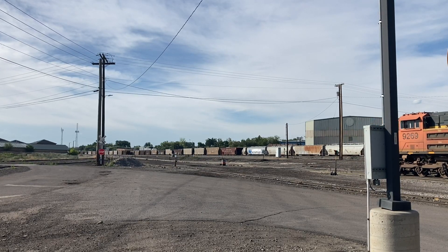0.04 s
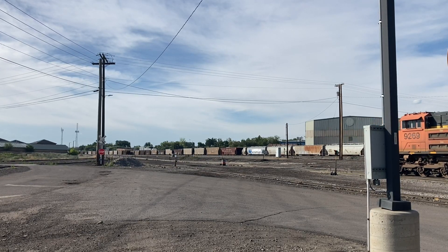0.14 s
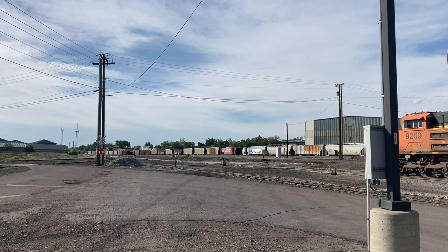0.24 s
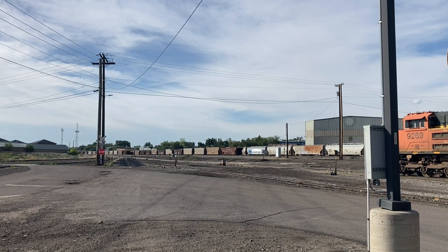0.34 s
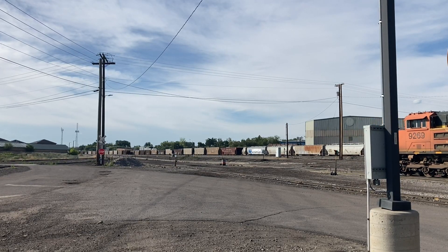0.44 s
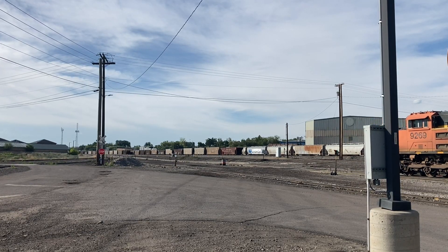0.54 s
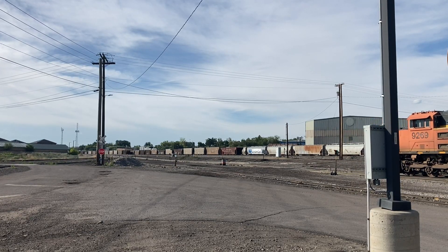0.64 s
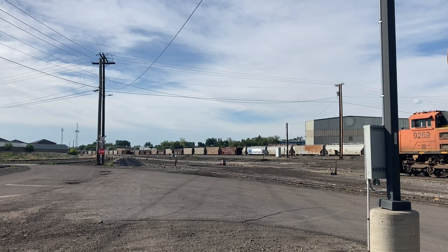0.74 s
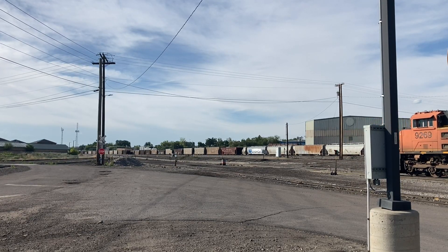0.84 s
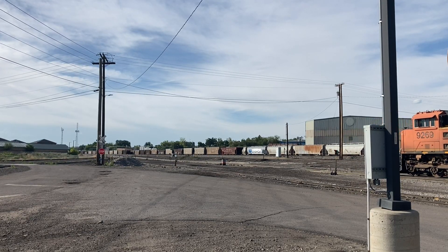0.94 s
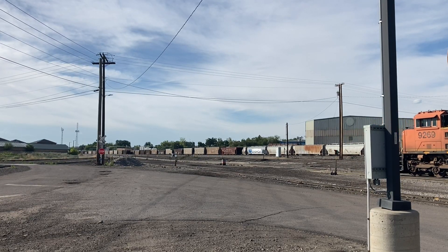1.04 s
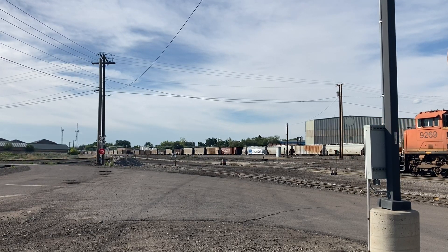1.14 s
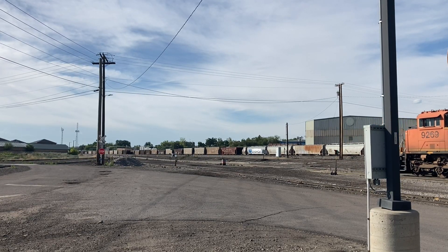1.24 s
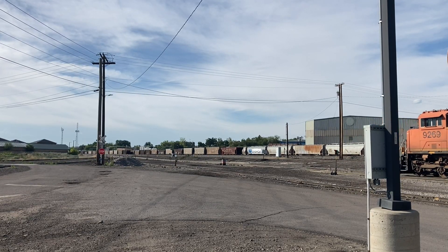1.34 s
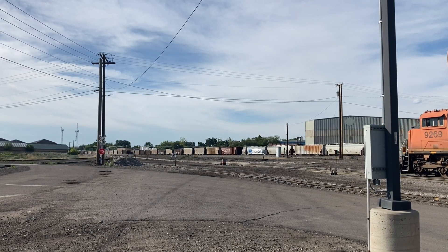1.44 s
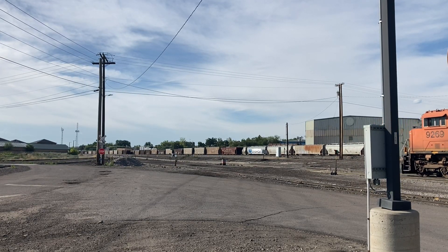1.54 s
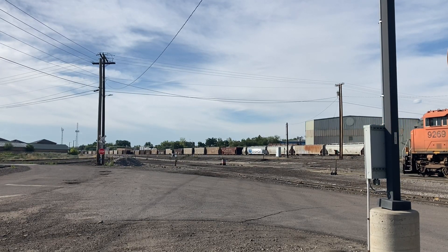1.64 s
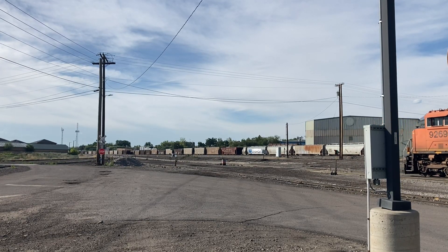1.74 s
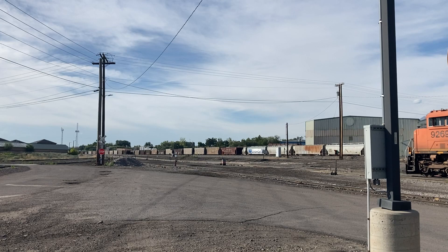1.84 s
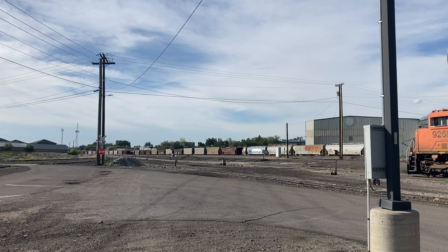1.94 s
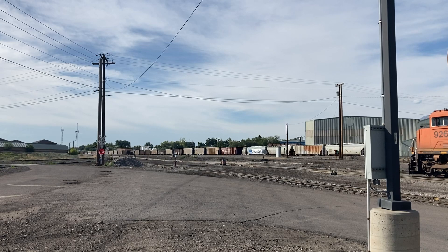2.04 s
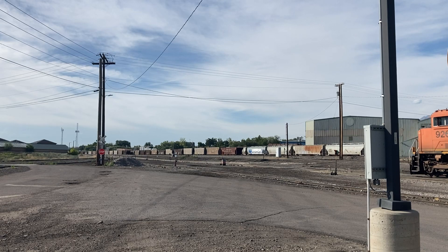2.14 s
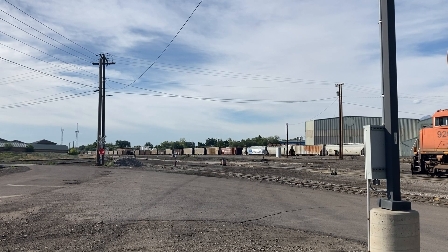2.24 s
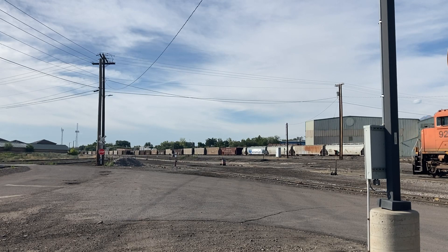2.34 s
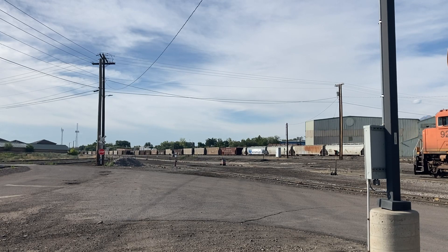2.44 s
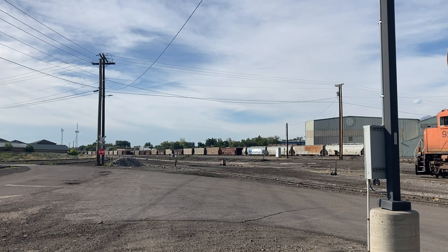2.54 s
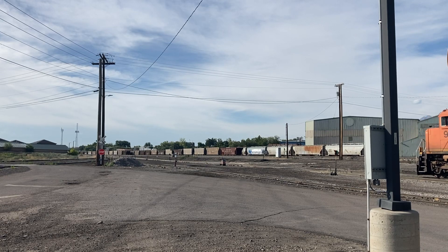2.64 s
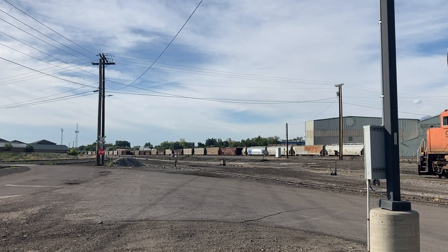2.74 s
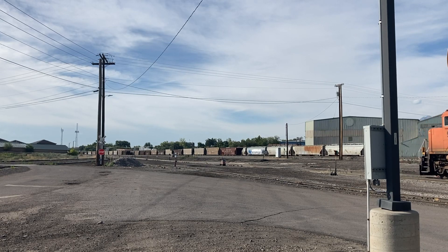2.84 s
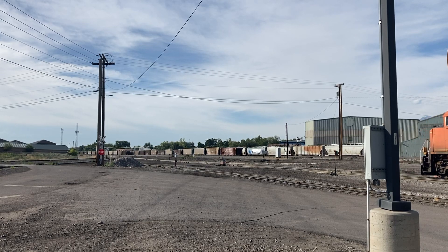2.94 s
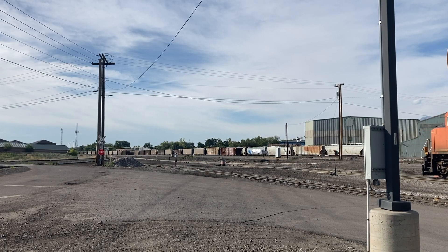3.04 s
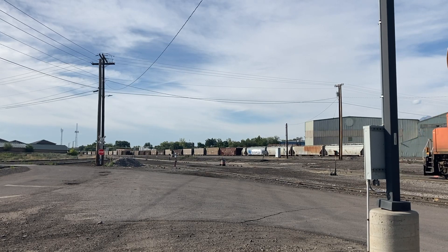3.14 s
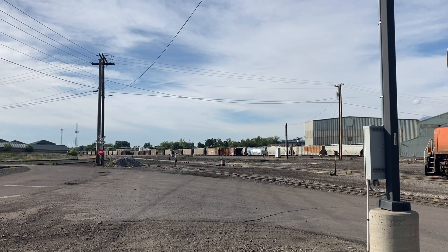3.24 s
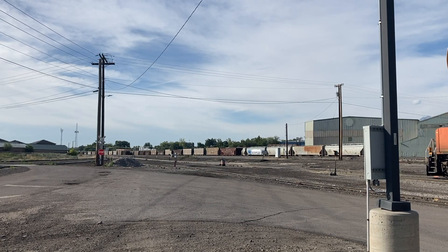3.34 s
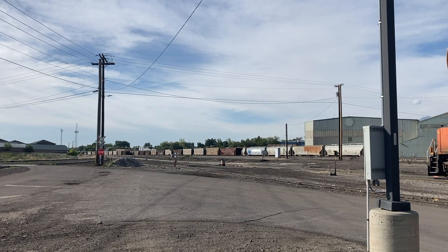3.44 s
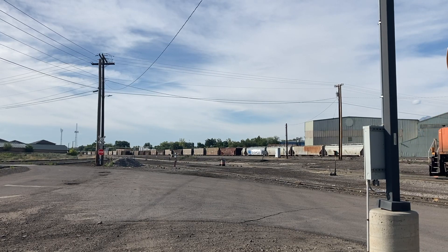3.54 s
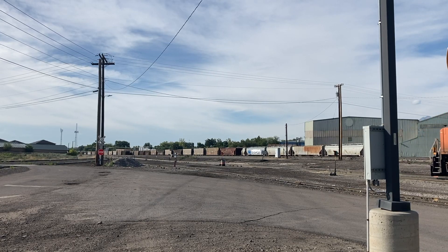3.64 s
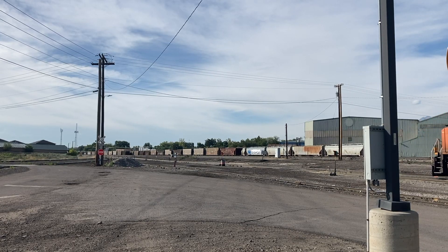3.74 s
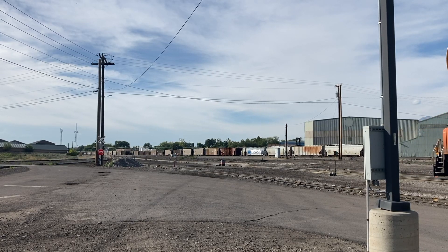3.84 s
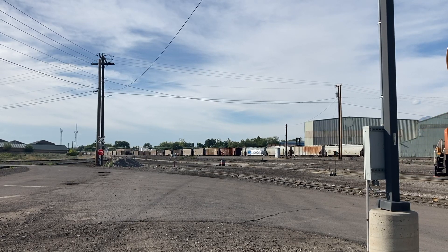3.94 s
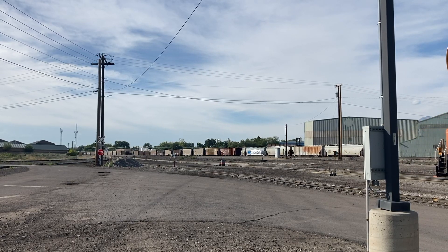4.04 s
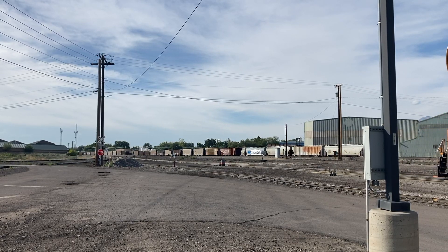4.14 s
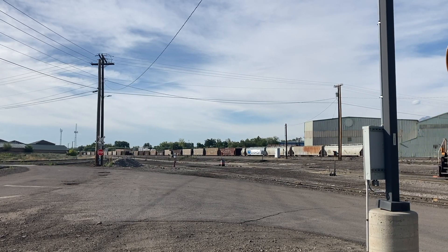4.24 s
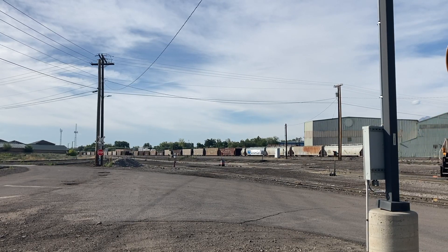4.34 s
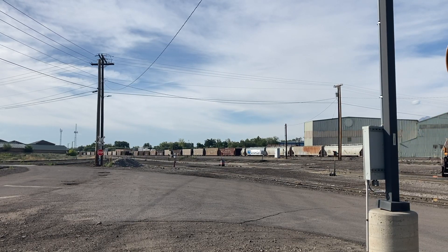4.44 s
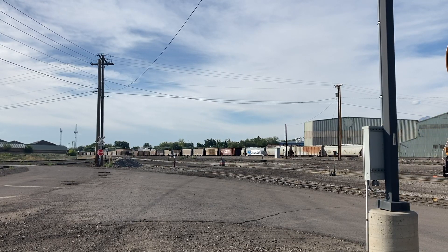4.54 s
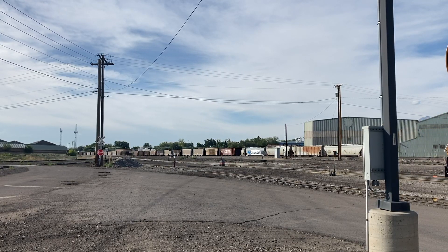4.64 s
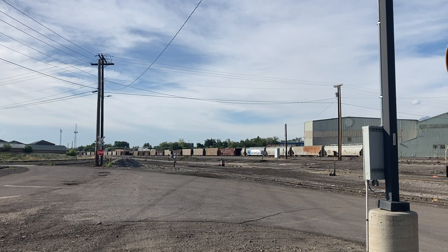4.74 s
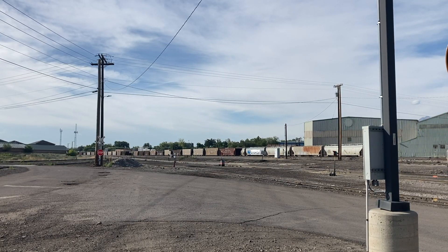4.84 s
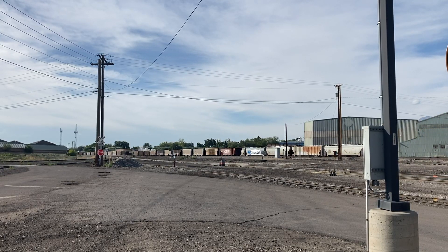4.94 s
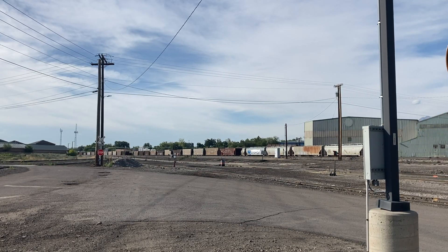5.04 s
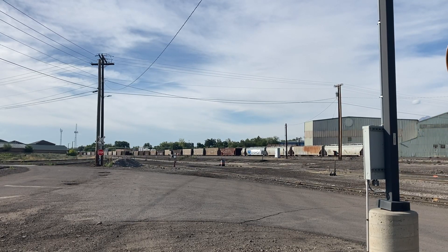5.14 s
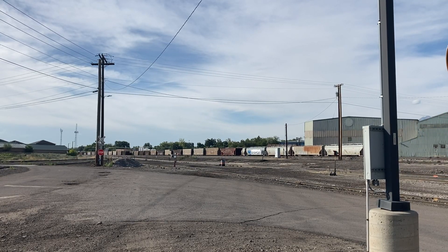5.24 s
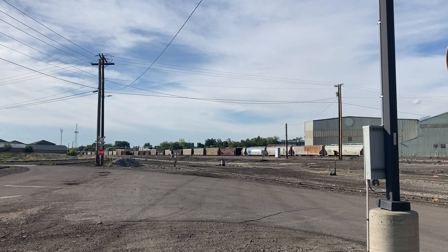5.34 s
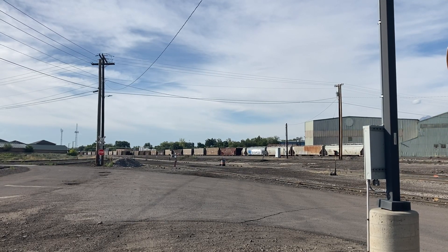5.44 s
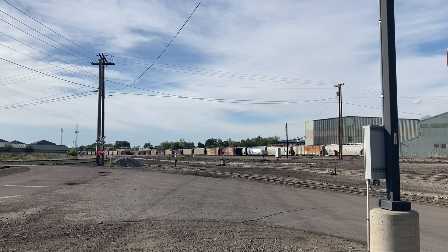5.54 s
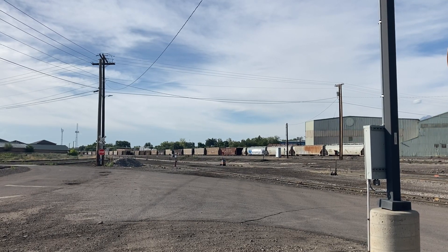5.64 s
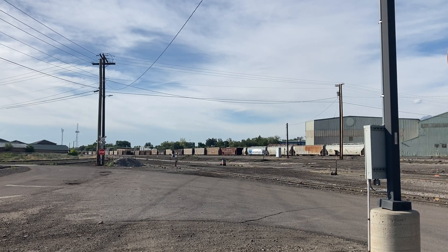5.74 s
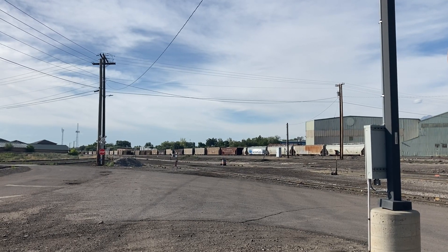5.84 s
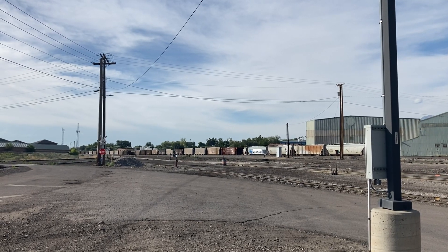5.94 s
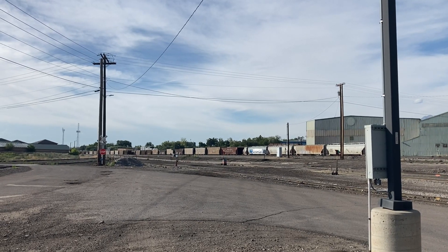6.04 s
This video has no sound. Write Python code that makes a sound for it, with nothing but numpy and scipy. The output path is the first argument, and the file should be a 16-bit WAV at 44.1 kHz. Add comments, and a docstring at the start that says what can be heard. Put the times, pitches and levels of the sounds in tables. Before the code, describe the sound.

A second engine hums behind a loud diesel drone, with cooling air rushing, panels rattling and little air puffs pulsing quickly. The whines rise slightly, then glide downward as the locomotive slows its engine and recedes. Short air spits break through, fast soft thumps stand out, and faint metallic wheel squeaks end it. Heard outdoors from a fixed phone across a yard, with a faint wall echo.

```python
"""A diesel engine's drone leads, with gear and turbocharger whine; it throttles down as the train rolls away.
A compressor thumps and puffs once a turn, a second engine hums behind, wheel flanges squeal near the end.
Shaft-locked sines make the engines, pulses through resonances the thumps, shaped noise the exhaust roar,
cooling air, puffs and rumble, knocked resonators the panel rattle. Two ports on a phone body listen."""
import sys
import numpy as np
from scipy import signal
from scipy.fft import rfft, irfft, next_fast_len
from scipy.io import wavfile
from scipy.ndimage import uniform_filter1d

SR = 44100
rng = np.random.default_rng(int(sys.argv[2]) if len(sys.argv) > 2 else 0)


def wrap_up_sound(samples):
    """Save the sound to the file named by the first command line argument, as 16-bit audio."""
    columns = np.atleast_2d(samples).T
    # keep every value between -1 and 1, then stretch to whole-number steps
    tamed = np.clip(columns, -1, 1)
    steps = np.round(tamed * 32767).astype(np.int16)
    wavfile.write(sys.argv[1], SR, steps)


N = 268569
SIZE = next_fast_len(N)
TIME, FREQ = np.arange(N) / SR, np.fft.rfftfreq(SIZE, 1 / SR)

# First engine: (time [s], four-stroke rate [cycles/s], turbocharger blade tone [Hz])
ENGINE_SPEED = [(0, 6.169, 5595), (.45, 6.174, 5620), (.95, 6.228, 5655), (1.35, 6.25, 5662),
                (1.7, 6.287, 5660), (1.95, 6.27, 5645), (2.27, 6.195, 5570), (2.65, 6.11, 5480),
                (3, 5.95, 5370), (3.4, 5.825, 5215), (3.7, 5.69, 5100), (4.1, 5.487, 4945),
                (4.55, 5.322, 4815), (5.3, 5.165, 4655), (6.09, 5.035, 4560)]
# Firing drone: (multiple of the cycle, relative level [dB])
FIRING_PARTS = [(8, 0), (9, -7), (10, -12)]
# Drone of uneven cylinders: (multiple of the cycle, relative level [dB])
UNEVEN_PARTS = [(9, -8), (10, -8), (11, -6), (12, -3), (13, -6), (14, -12), (15, -5), (16, -6), (17, -10),
                (19, -10)]
# Gear whines: teeth meshing per cycle, in the column order of GEAR_LEVELS
GEAR_TEETH_PER_CYCLE = [221.3, 442.6, 191.7, 110.6, 97.2]
# Gear whines: (time [s], then the level of each whine [dB])
GEAR_LEVELS = [(0, -37, -68, -63, -63, -64), (.4, -38, -65, -62, -60, -62), (.7, -39, -62, -62, -54, -60),
               (.87, -47, -72, -64, -40, -60), (1.05, -38, -54, -62, -44, -60),
               (1.33, -49, -59, -49, -55, -60), (1.45, -41.5, -52.5, -48, -53, -60),
               (2.03, -38, -53.5, -48, -60, -60), (2.13, -46.5, -63, -55, -56, -58),
               (2.6, -42, -55, -60, -52, -54), (2.75, -52, -61, -60, -50, -54),
               (2.9, -44, -63, -64, -43, -53), (3.15, -52, -55, -62, -49, -52),
               (3.45, -50, -67, -68, -44, -54), (3.6, -63, -70, -68, -53, -46.5),
               (4.05, -58, -74, -70, -55, -49.5), (4.3, -48.5, -70, -66, -57, -51.5),
               (5.2, -52.5, -70, -72, -58, -57), (5.5, -55, -69, -69, -57, -50),
               (6.09, -56, -75, -71, -61.5, -51)]
# First turbocharger: (time [s], level [dB])
TURBO_LEVEL = [(0, -58), (.2, -63), (.75, -65), (1, -53), (1.5, -58), (1.7, -66), (1.85, -57), (2.15, -67),
               (2.35, -59), (2.9, -59), (3.4, -57), (3.95, -55), (4.17, -61), (4.4, -56), (4.75, -57),
               (5.1, -61), (5.6, -57.5), (6.09, -55)]
# Second turbocharger: (time [s], blade tone [Hz], level [dB])
FAR_TURBO = [(3.9, 5480, -86), (4.8, 5460, -73), (6.09, 5440, -72)]
# Second engine drone: (multiple of the cycle, relative level [dB])
SECOND_DRONE_PARTS = [(11, 0), (13, 0), (15.6, -10), (17, -8), (19, -12)]
# Second engine gear: (multiple of the cycle, relative level [dB])
SECOND_GEAR_PARTS = [(212.6, 0)]
# Second engine gear whine: (time [s], level [dB])
SECOND_WHINE_LEVEL = [(0, -38), (.5, -39), (.75, -43), (1.15, -36), (1.3, -45), (1.6, -45), (1.9, -54),
                      (2.5, -52), (2.9, -58), (3.3, -49), (3.5, -60), (4, -80)]
# Low hum: (time [s], fundamental [Hz], level [dB])
HUM_GLIDE = [(0, 34.6, -48), (1.4, 34.8, -42), (2, 35, -31), (3.6, 33.8, -33), (4.4, 34, -28),
             (5.3, 33.2, -29), (6.09, 32.5, -32)]
# Low hum: (multiple of the fundamental, relative level [dB])
HUM_PARTS = [(1, -9), (2, 0)]
# Compressor thump: (time [s], level [dB])
THUMP_LEVEL = [(0, -29.5), (1.2, -28), (2, -26), (2.8, -22.5), (4.2, -21.5), (5.5, -21.5), (6.09, -29)]
# Stroke timing, drifting later against the puffs: (time [s], place in the turn [turns])
STROKE_PLACE = [(0, -.34), (1.8, -.34), (2.6, -.16), (3.2, -.08), (4.2, -.02), (5.4, .06), (6.09, .03)]
# Intake pipe modes: (centre [Hz], width [Hz], relative level [dB], delay [s])
INTAKE_MODES = [(124, 31.4, -4.5, 0.00012), (149.7, 27.2, 0.5, 0.00061), (189.2, 28.7, 3, .014),
                (208.4, 22.3, 0.5, .014)]
# Compressor casing modes: (centre [Hz], width [Hz], relative level [dB], delay [s])
CASING_MODES = [(296, 20, -27, .014), (350, 20, -26, .014), (685, 40, -30, .014)]
# Valve plate chirp: (time [s], level [dB])
CHIRP_LEVEL = [(1.5, -68), (2.5, -59), (3.5, -59), (4, -66)]
# Discharge valve puffs: (time [s], level [dB])
PUFF_LEVEL = [(0, -57), (1, -58), (2, -61), (2.6, -59), (3.4, -63), (4.4, -66), (6.09, -68)]
# Exhaust roar colour: (frequency [Hz], relative level [dB per Hz])
ROAR_COLOUR = [(215, 8.5), (250, 2.5), (330, 0.5), (450, -2.5), (540, -7), (690, 1.5), (780, -9), (950, -5),
               (1300, -20.5)]
# Cooling air colour: (frequency [Hz], relative level [dB per Hz])
AIR_COLOUR = [(900, -13), (1350, 3), (1650, -7), (2100, -8.5), (2600, -9), (3150, -13), (3600, -16.5),
              (4500, -18), (5500, -21.5), (6900, -23), (8300, -27.5), (9300, -45), (10700, -30.5),
              (14800, -44.5)]
# Slow rise and fall over the distance fade: (time [s], hiss offset [dB], roar offset [dB])
AIR_LIFT = [(0, -1, -0.5), (.7, 0.9, 0.8), (1, 1, 0.8), (1.33, 0.5, 1.1), (1.45, -1, 1.2), (2, -0.4, -0.8),
            (2.5, 0.5, 0), (3.3, 0.3, -1), (4, -0.1, -0.5), (4.8, 1.2, 0.5), (5.4, 0.9, 0.5),
            (6.09, -0.5, 2)]
# Rumble colour: (frequency [Hz], relative level [dB per Hz])
RUMBLE_COLOUR = [(20, -31.5), (32, -20), (48, -32), (70, -6), (100, -9), (122, -12), (145, -5.5),
                 (170, -13), (205, -9), (250, -27.5)]
# Exhaust stack modes: (centre [Hz], width [Hz], level at the start [dB])
STACK_MODES = [(297, 16, -45), (350, 20, -52), (455, 22, -51), (625, 20, -50), (688, 30, -50)]
# Loose hood panels: (centre [Hz], width [Hz], relative level [dB])
HOOD_PANELS = [(1443, 78, 4), (2093, 60, 0), (2430, 72, -6.5), (2994, 39, -4), (3275, 69, -4),
               (3830, 53, -7), (4277, 71, -7), (4780, 66, -9), (6040, 81, -18.5)]
# Air drain spits: (time [s], peak level [dB], half length [s])
SPITS = [(.826, -50, .016), (2.285, -49.5, .02), (2.59, -56, .025), (3.85, -54, .008)]
# Wheel flange squeals: (time [s], tone [Hz], peak level [dB], half length [s])
SQUEALS = [(5.68, 2255, -57, .06), (5.83, 2248, -49, .05), (5.93, 2240, -52, .04), (6.05, 2235, -43, .045)]
# Two ports: (frequency [Hz], left minus right [dB], left lag beyond the path [rad], share heard alike)
PORTS = [(40, 4.5, -0.47, 0.57), (141, -3.5, 0.057, 1), (284, 1, 0.038, 1), (417, 1.5, 0.82, 0.9),
         (610, -0.5, 0.96, 0.94), (872, -8, -0.0096, 0.98), (1090, 3.5, 0.75, 0.5), (1378, -1.5, -0.14, 1),
         (2240, 2.5, -0.23, 0.05), (3080, 1.5, -0.022, 0.99), (4360, 0.5, -1.47, 0.57),
         (5620, -3, 1.2, 0.2), (7040, 0, 1.55, 0.77), (8700, -1, 1.5, 1), (11400, 0.5, 0.95, 1),
         (14000, -1.5, 1.3, .85)]

LOADED_CYCLES_PER_S = 6.25
# firing: under load; loss per (cycle/s) squared of lost speed; floor off load
FIRING_DB, FIRING_SAG_DB, FIRING_IDLE_DB = -16.5, 17.5, -32.5
# under load; gain per cycle/s of lost speed
UNEVEN_DB, UNEVEN_RISE_DB = -32.5, 6.5
# at the lowest blade tone; more as it runs faster
FLUTTER_RAD, FLUTTER_RAD_PER_KHZ = .75, .75
SECOND_DB, SECOND_FADE_DB_PER_S2 = -19, 2.5
DRONE_PER_TURN = 30.38
COMPRESSOR_TURNS_PER_S, SLOWS_FROM_S, SLOWING_PER_S = 11.87, 1.55, .0427
# compressor turns per cycle of the second engine, which drives it
TURNS_PER_CYCLE = 1.978
PUFF_OPENS_TURN, PUFF_HOLD_TURN, PUFF_DIES_TURN, CHIRP_TURN = .56, .44, .14, .74
# at the start
ROAR_DB, AIR_DB, RUMBLE_DB, RATTLE_DB = -31, -41.5, -24.5, -52.5
RATTLE_FITS_DB, RATTLES_PER_S, RATTLE_SCATTER_DB = 2.5, 450, 3
# distance at the start, speed away
START_M, RECEDES_M_PER_S = 37, 8.13
# part of the distance loss that the bass suffers
RUMBLE_SHARE = 0.41
SHED_ECHO_S, SHED_ECHO_DB = .068, -10
LEFT_LAG_S, TOP_HZ, EDGE_SAMPLES = 11 / 44100, 12800, 2048


def undb(db):
    """dB to gain."""
    return 10 ** (np.asarray(db) / 20)


def unit(x):
    """Scale to rms 1."""
    return x / np.sqrt(np.mean(x ** 2))


def curves(table):
    """Columns of a time table at every sample."""
    s, *columns = np.transpose(table)
    return [np.interp(TIME, s, c) for c in columns]


def over_freq(table):
    """Columns of a frequency table at every spectral bin, on a log axis."""
    hz, *columns = np.transpose(table)
    return [np.interp(np.log(FREQ + 1), np.log(hz), c) for c in columns]


def walk(rate_hz):
    """Random levels held 1 / rate_hz s and slewed twice; spread near 1."""
    hold = int(SR / rate_hz)
    steps = np.repeat(rng.standard_normal(N // hold + 1), hold)
    return 1.38 * uniform_filter1d(uniform_filter1d(steps, hold), hold)[:N]


def swell(centre_s, db, half_s):
    """Bell-shaped envelope."""
    return undb(db) * np.exp(-.5 * ((TIME - centre_s) / half_s) ** 2)


def turns(rate_hz):
    """Turns counted since the start, the rate smoothed over 1/4 s."""
    return np.cumsum(uniform_filter1d(rate_hz, SR // 4)) / SR


def tones(turn, parts, waver_db, waver_hz, slip_rad):
    """Sines locked to a shaft, wavering in level and phase about the tabled rms."""
    total = 0
    for multiple, db in parts:
        level = np.sqrt(2) * undb(db + waver_db * walk(waver_hz))
        phase = 2 * np.pi * (multiple * turn + rng.random()) + slip_rad * walk(waver_hz)
        total = total + level * np.sin(phase)
    return total


def whistle(hz, db, waver_db, waver_hz, slip_rad):
    """One gliding tone."""
    return undb(db) * tones(turns(hz), [(1, 0)], waver_db, waver_hz, slip_rad)


def resonance(hz, width_hz):
    """Response of one damped mode, gain 1 at the centre."""
    return 1j * FREQ * width_hz / (hz ** 2 - FREQ ** 2 + 1j * FREQ * width_hz)


def filtered(spectrum, response):
    """Spectrum through a response, back in time."""
    return irfft(spectrum * response, SIZE)[..., :N]


def band(x, low_hz, high_hz):
    """Steep band-pass."""
    return signal.sosfilt(signal.butter(4, [low_hz, high_hz], "band", fs=SR, output="sos"), x)


def noise(colour, flicker_db, swell_db):
    """Two unrelated noises of one colour; each band flickers, all swell together."""
    spectrum = rfft(rng.standard_normal((2, SIZE))) * undb(over_freq(colour)[0])
    edges_hz = [hz for hz, _ in colour]
    surge_db = swell_db * walk(3)
    total = 0
    for low_hz, high_hz in zip(edges_hz[:-1], edges_hz[1:]):
        inside = (FREQ >= low_hz) & (FREQ < high_hz)
        total = total + undb(surge_db + flicker_db * walk(11)) * filtered(spectrum, inside)
    return total


def distance_db():
    """Spherical spreading loss as the train rolls away."""
    return -20 * np.log10(1 + RECEDES_M_PER_S * TIME / START_M)


def compressor_rate():
    """Compressor turns per s: steady, then slowing by a fixed share each second."""
    return COMPRESSOR_TURNS_PER_S * np.exp(-SLOWING_PER_S * np.maximum(TIME - SLOWS_FROM_S, 0))


def engines():
    """All steady machine tones: both engines, low hum, turbochargers."""
    return first_engine() + second_engine() + hum() + turbochargers()


def first_engine():
    """Exhaust and gear orders of the four-stroke cycle; firing sags and unevenness grows as speed drops."""
    speed, _ = curves(ENGINE_SPEED)
    cycle = turns(speed)
    lost = np.maximum(LOADED_CYCLES_PER_S - speed, 0)
    firing_db = np.maximum(FIRING_DB - FIRING_SAG_DB * lost ** 2, FIRING_IDLE_DB)
    firing_db = firing_db + RUMBLE_SHARE * distance_db()
    uneven_db = UNEVEN_DB + UNEVEN_RISE_DB * lost
    firing = undb(firing_db) * tones(cycle, FIRING_PARTS, waver_db=1.3, waver_hz=5, slip_rad=.12)
    uneven = undb(uneven_db) * tones(cycle, UNEVEN_PARTS, waver_db=2, waver_hz=2.5, slip_rad=.3)
    gear_parts = zip(GEAR_TEETH_PER_CYCLE, curves(GEAR_LEVELS))
    gears = tones(cycle, gear_parts, waver_db=1.3, waver_hz=14, slip_rad=.35)
    return firing + uneven + gears


def turbochargers():
    """Blade-passing tones; turbulent air on the way breaks them into fluttering bands."""
    _, blade_hz = curves(ENGINE_SPEED)
    blade_db, = curves(TURBO_LEVEL)
    blade_db = blade_db + 2.4 * walk(20)
    flutter_rad = FLUTTER_RAD + FLUTTER_RAD_PER_KHZ * (blade_hz - blade_hz.min()) / 1000
    far_hz, far_db = curves(FAR_TURBO)
    near = whistle(blade_hz, blade_db, waver_db=3, waver_hz=100, slip_rad=flutter_rad)
    far = whistle(far_hz, far_db, waver_db=3, waver_hz=100, slip_rad=flutter_rad)
    return near + far


def second_engine():
    """Drone and gear whine locked to the compressor it drives; the drone fades ever faster."""
    cycle = turns(compressor_rate() / TURNS_PER_CYCLE)
    drone_db = SECOND_DB - SECOND_FADE_DB_PER_S2 * TIME ** 2
    drone = undb(drone_db) * tones(cycle, SECOND_DRONE_PARTS, waver_db=1.2, waver_hz=3, slip_rad=.25)
    whine = tones(cycle, SECOND_GEAR_PARTS, waver_db=1.1, waver_hz=12, slip_rad=.6)
    return drone + undb(*curves(SECOND_WHINE_LEVEL)) * whine


def hum():
    """A low gliding hum, plus a brief low tone that glides with the compressor."""
    hz, db = curves(HUM_GLIDE)
    steady = undb(db) * tones(turns(hz), HUM_PARTS, waver_db=1, waver_hz=3, slip_rad=.2)
    drone = tones(turns(compressor_rate()), [(DRONE_PER_TURN, 0)], waver_db=2, waver_hz=4, slip_rad=.3)
    return steady + swell(centre_s=2.75, db=-44, half_s=.4) * drone


def compressor(turn):
    """One intake stroke a turn rings the intake pipe and casing; a valve plate chirps once a turn."""
    pulses = strokes(turn - curves(STROKE_PLACE)[0])
    pipe = 0
    for k, (hz, width_hz, db, delay_s) in enumerate(INTAKE_MODES + CASING_MODES):
        delay = np.exp(-2j * np.pi * FREQ * delay_s)
        # cubed: pipe, filter box and hood in series give each ring a soft rise
        pipe = pipe + (-1) ** k * undb(db) * resonance(hz, width_hz) ** 3 * delay
    thump = undb(*curves(THUMP_LEVEL)) * unit(filtered(rfft(pulses, SIZE), pipe))
    plate = tones(3150 * TIME, [(1, 0)], waver_db=2, waver_hz=60, slip_rad=1.2)
    gate = chirp_gate(turn - CHIRP_TURN, sharpness=1.5) * undb(1.5 * walk(10))
    return thump + undb(*curves(CHIRP_LEVEL)) * gate * plate


def strokes(turn):
    """One pulse a turn, each a little different in level."""
    count = np.floor(turn)
    return np.diff(count, prepend=count[0]) * undb(.9 * rng.standard_normal(N))


def chirp_gate(turn, sharpness):
    """Envelope swelling once a turn; mean power 1."""
    return unit(np.exp(sharpness * np.cos(2 * np.pi * turn)) * undb(0.5 * walk(4.5)))


def airflow(turn):
    """All noise of air and panels, as two unrelated draws; most of it fades with distance."""
    far_db = distance_db()
    hiss_db, lift_db = curves(AIR_LIFT)
    rumble = unit(noise(RUMBLE_COLOUR, flicker_db=1, swell_db=.5))
    roar = noise(ROAR_COLOUR, flicker_db=1.7, swell_db=.55)
    roar = roar / np.std(band(roar, 240, 1100))
    air = noise(AIR_COLOUR, flicker_db=1.18, swell_db=0.86)
    air = air / np.std(band(air, 1500, 8500))
    out = undb(RUMBLE_DB + RUMBLE_SHARE * far_db) * rumble + stack()
    out = out + undb(ROAR_DB + far_db + lift_db) * roar
    out = out + undb(AIR_DB + far_db + hiss_db) * air
    return out + undb(hiss_db) * rattle() + valve_air(turn)


def stack():
    """Exhaust noise rings the stack at a few pitches that come and go."""
    white = rfft(rng.standard_normal((2, SIZE)))
    total = 0
    for hz, width_hz, db in STACK_MODES:
        level_db = db + 3.96 * walk(5) + RUMBLE_SHARE * distance_db()
        total = total + undb(level_db) * unit(filtered(white, resonance(hz, width_hz) ** 2))
    return total


def valve_air(turn):
    """Jet hiss through resonances: discharge puffs each turn and brief spits of the air drain."""
    white = rfft(rng.standard_normal((2, SIZE)))
    valve = resonance(10190, 2000) ** 2
    valve = valve + undb(-10.0) * resonance(12100, 7000) ** 2 + undb(1.0) * resonance(6700, 600) ** 2
    drain = resonance(7070, 1900) ** 2 + undb(-16) * resonance(5500, 5000) ** 2
    puffs = undb(*curves(PUFF_LEVEL)) * blow(turn) * unit(filtered(white, valve))
    spits = sum(swell(*spit) for spit in SPITS)
    return puffs + spits * unit(filtered(white, drain))


def blow(turn):
    """Discharge valve snaps open, holds, dies away; each turn its own strength; mean power 1."""
    opened = turn - PUFF_OPENS_TURN
    strength = undb(1.5 * rng.standard_normal(N)[np.floor(opened + 1).astype(int)])
    flow = strength * np.exp(-np.maximum(opened % 1 - PUFF_HOLD_TURN, 0) / PUFF_DIES_TURN)
    # small constant leak; 5 ms smoothing
    return unit(0.14 + uniform_filter1d(flow, size=SR // 200))


def rattle():
    """Hood panels knocked at random, in fits, ring briefly as two-pole modes; two unrelated draws."""
    total = 0
    for hz, width_hz, db in HOOD_PANELS:
        hits = rng.random((2, N)) < RATTLES_PER_S / SR
        knocks = hits * undb(RATTLE_SCATTER_DB * rng.standard_normal(N))
        pole = np.exp(-np.pi * width_hz / SR)
        ring = signal.lfilter([1], [1, -2 * pole * np.cos(2 * np.pi * hz / SR), pole ** 2], knocks)
        total = total + undb(db + RATTLE_FITS_DB * walk(7)) * unit(ring)
    return undb(RATTLE_DB + distance_db()) * total


def squeal():
    """Wheel flanges sing briefly on the curve, as wavering tones."""
    total = 0
    for centre_s, hz, db, half_s in SQUEALS:
        tone = tones(hz * TIME, [(1, 0)], waver_db=1.5, waver_hz=30, slip_rad=.9)
        total = total + swell(centre_s, db, half_s) * tone
    return total


def scene():
    """Row 0 is the sound straight from the train, row 1 what the yard scatters from elsewhere."""
    turn = turns(compressor_rate())
    out = airflow(turn)
    pump = compressor(turn)
    # a shed wall beside the track returns each stroke late and faint
    echo = undb(SHED_ECHO_DB) * np.interp(TIME - SHED_ECHO_S, TIME, pump)
    machines = engines() + squeal() + pump + echo
    out[0] += machines
    # only the short waves of the machines scatter
    late = np.interp(TIME - SHED_ECHO_S, TIME, machines)
    out[1] += undb(-4) * band(late, 1000, 9000)
    return out


def record(dry):
    """The left port hears later, coloured by the phone body, and part of its sound is scattered."""
    padded = np.pad(dry, ((0, 0), (EDGE_SAMPLES, EDGE_SAMPLES)), mode="reflect", reflect_type="odd")
    length = padded.shape[1]
    padded = padded * signal.windows.tukey(length, 2 * EDGE_SAMPLES / length)
    size = next_fast_len(length)
    hz = np.fft.rfftfreq(size, 1 / SR)
    pan_db, lag_rad, alike = (np.interp(hz, FREQ, c) for c in over_freq(PORTS))
    alike = np.clip(alike, 0, 1)
    straight, scattered = rfft(padded, size)
    left = alike * straight + np.sqrt(1 - alike ** 2) * scattered
    left = left * np.exp(-1j * (2 * np.pi * hz * LEFT_LAG_S + lag_rad))
    ports = irfft(np.array([left * undb(pan_db / 2), straight * undb(-pan_db / 2)]), size)
    low_pass = signal.ellip(8, .2, 70, TOP_HZ, fs=SR, output="sos")
    return signal.sosfilt(low_pass, ports)[:, EDGE_SAMPLES:EDGE_SAMPLES + N]


dry = scene()
out = record(dry)
wrap_up_sound(out)
```